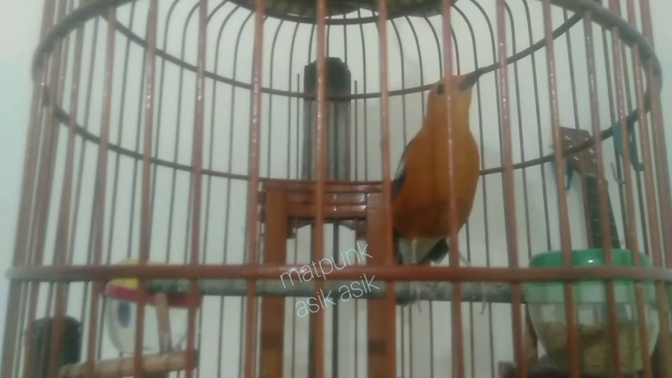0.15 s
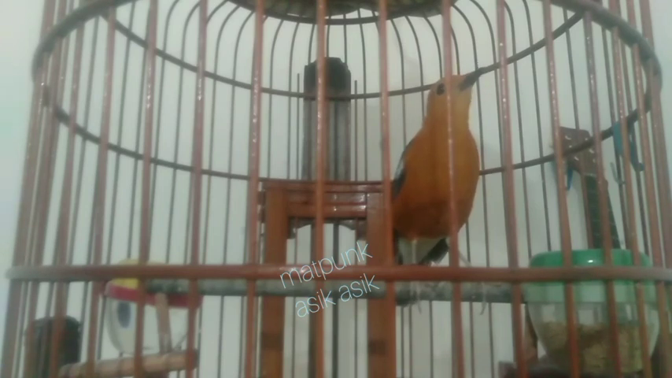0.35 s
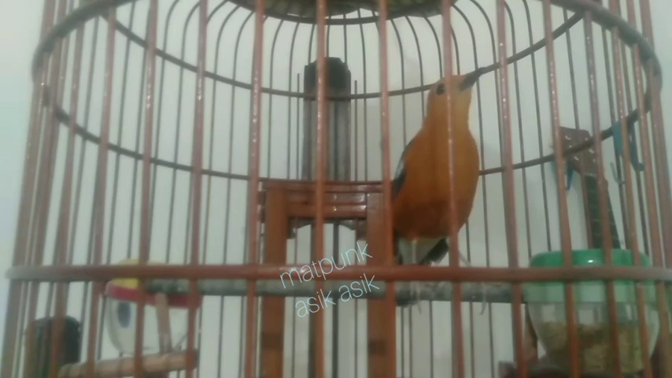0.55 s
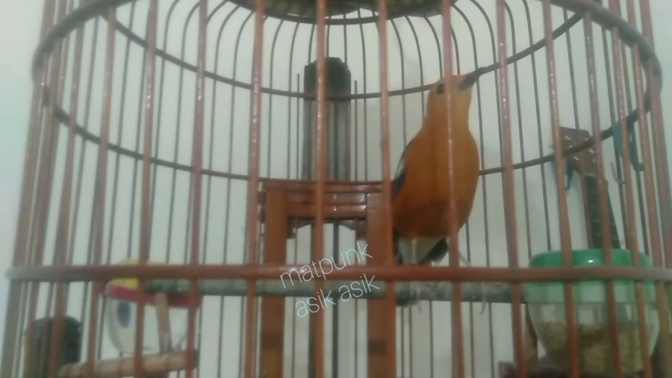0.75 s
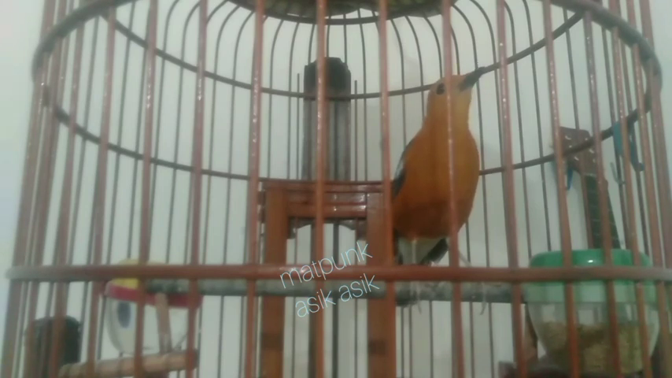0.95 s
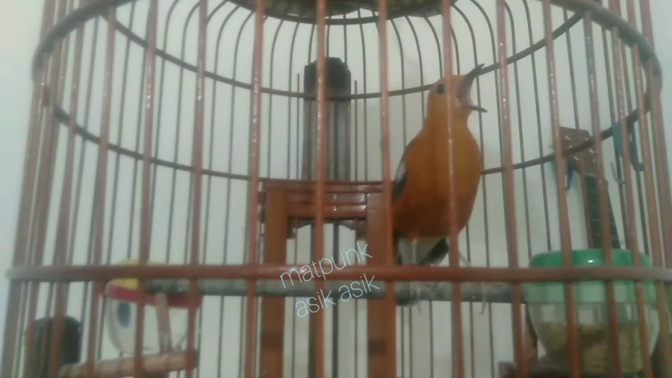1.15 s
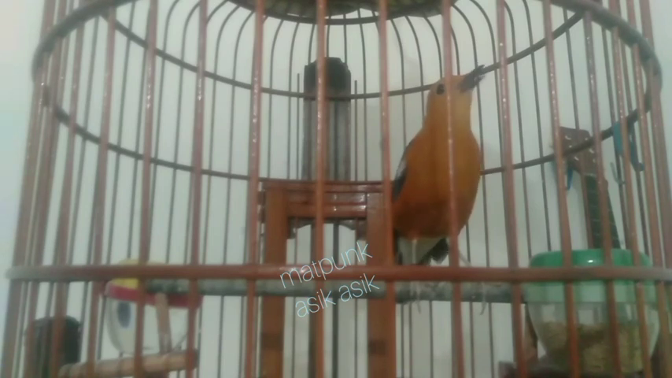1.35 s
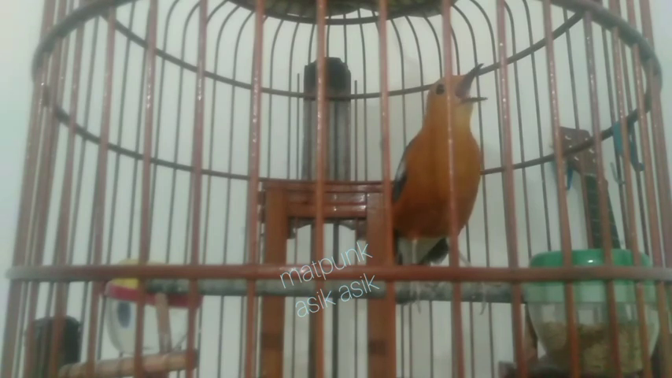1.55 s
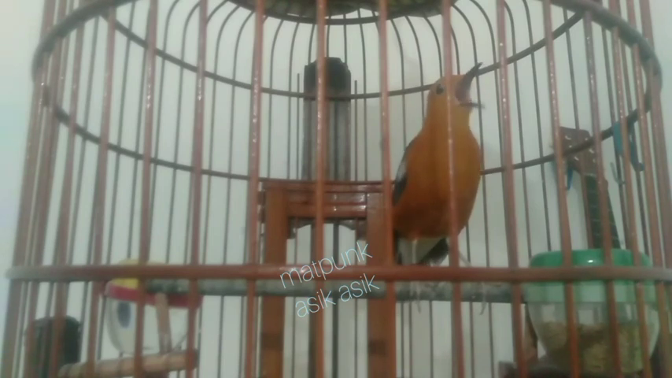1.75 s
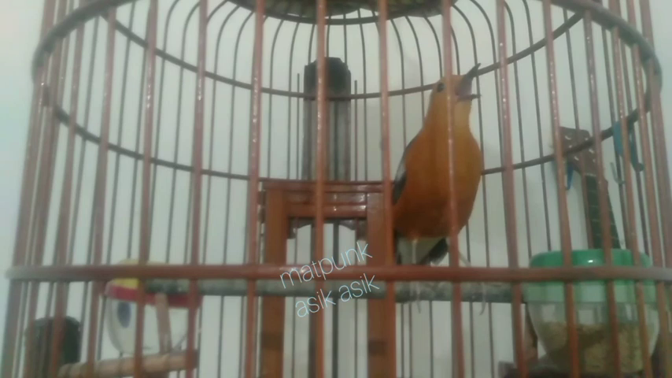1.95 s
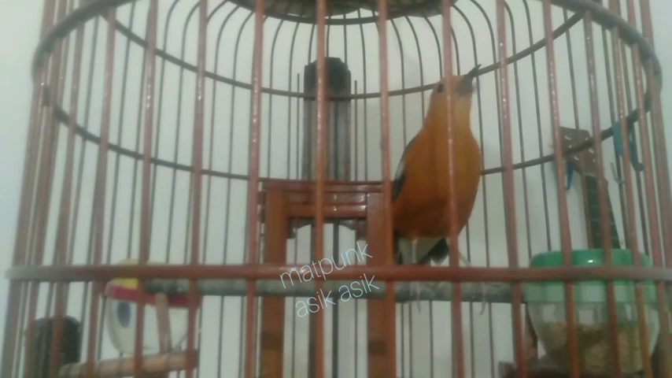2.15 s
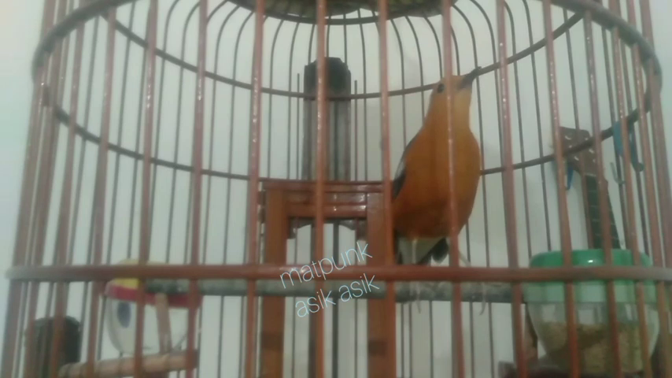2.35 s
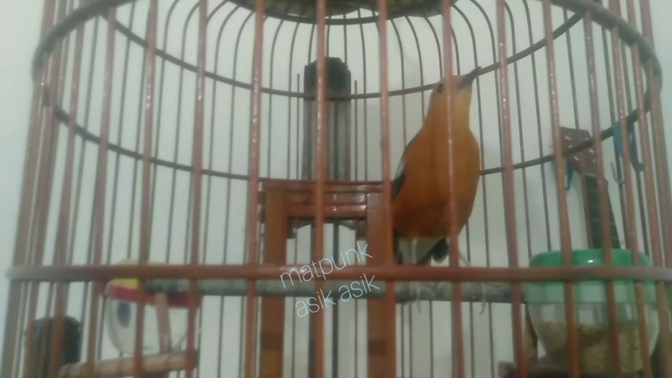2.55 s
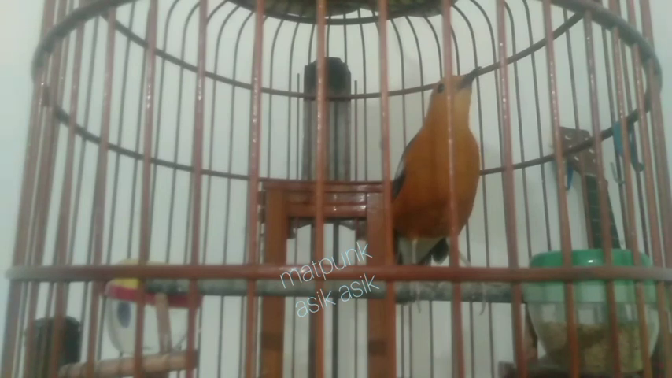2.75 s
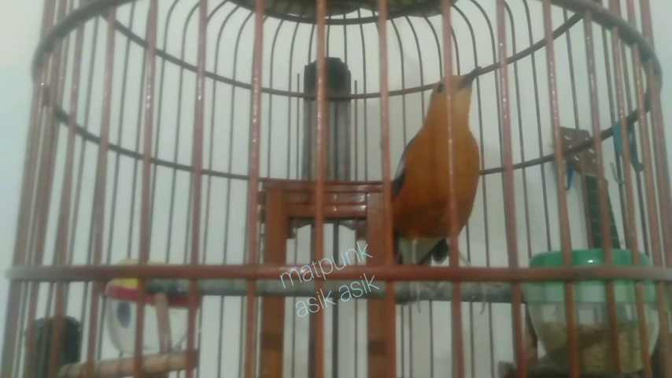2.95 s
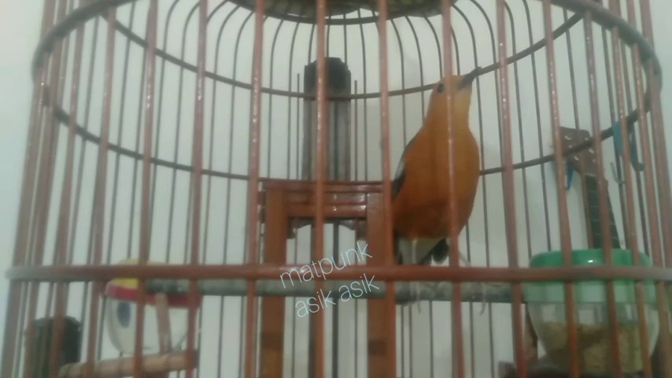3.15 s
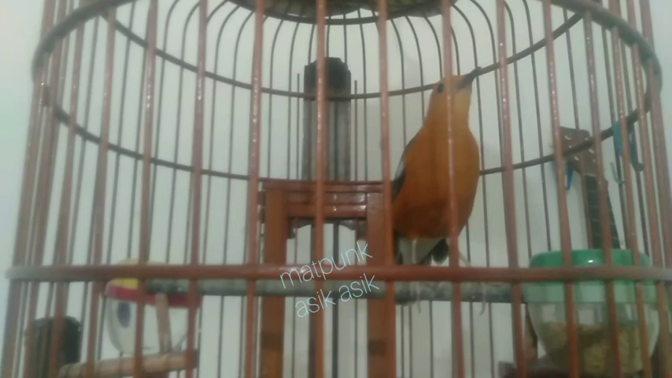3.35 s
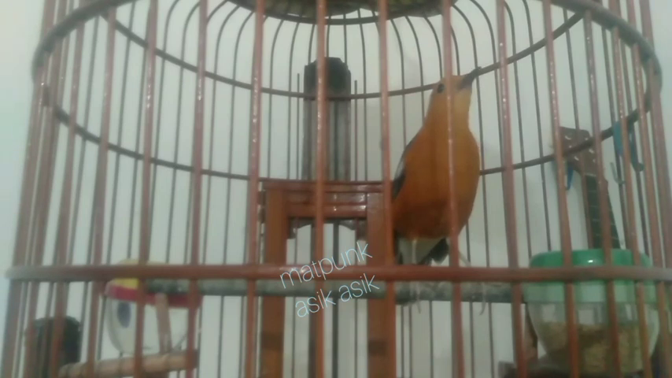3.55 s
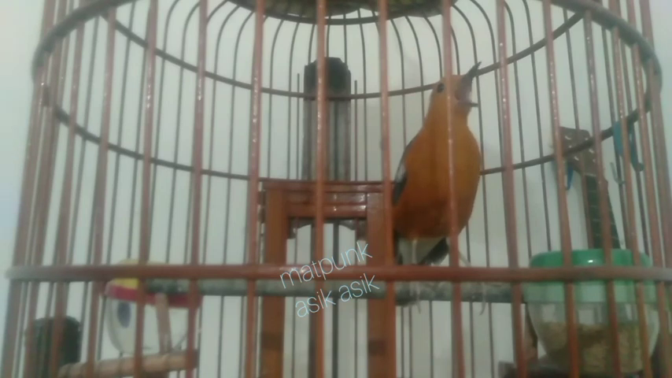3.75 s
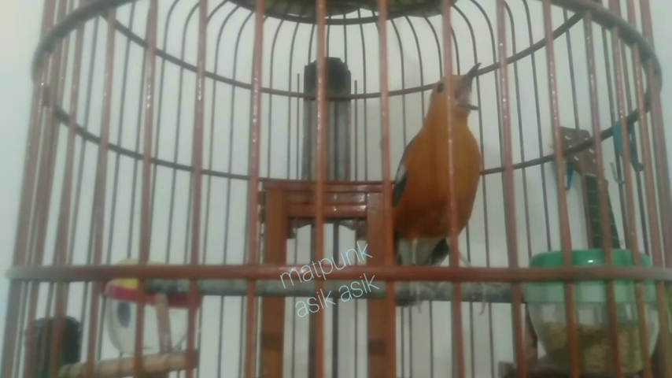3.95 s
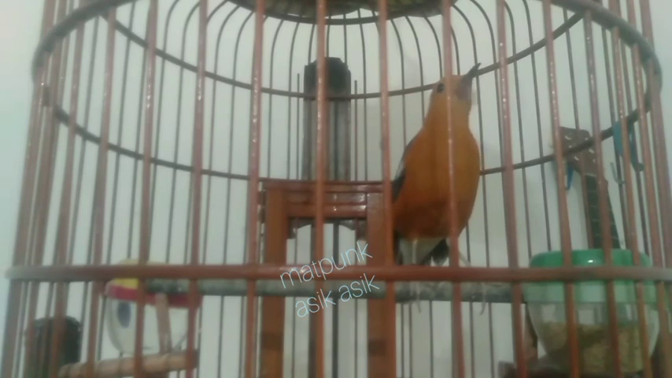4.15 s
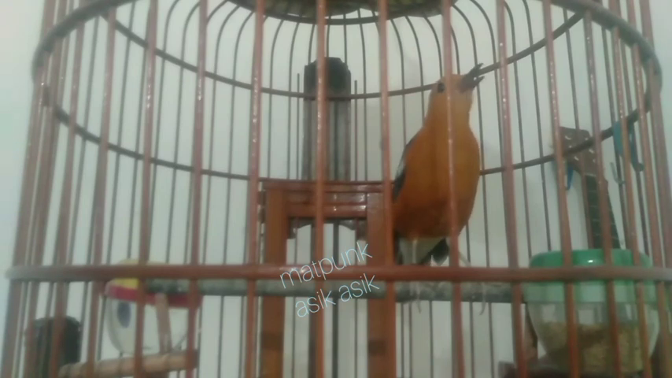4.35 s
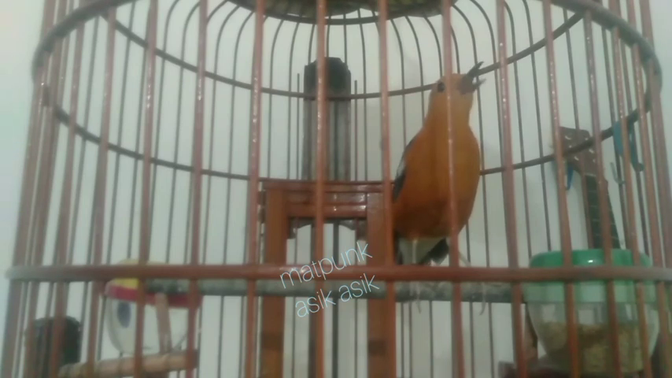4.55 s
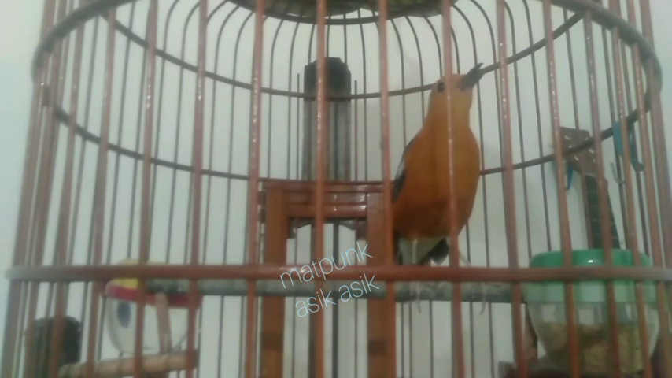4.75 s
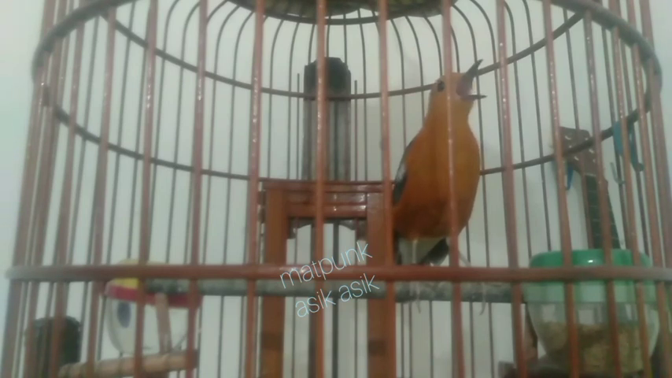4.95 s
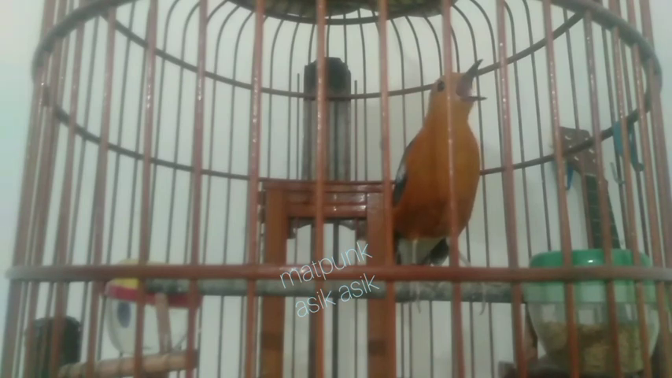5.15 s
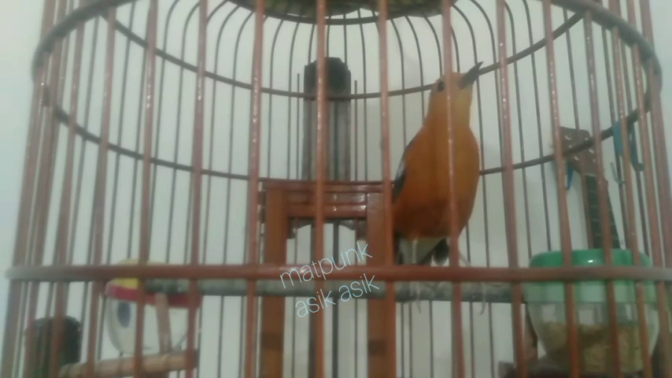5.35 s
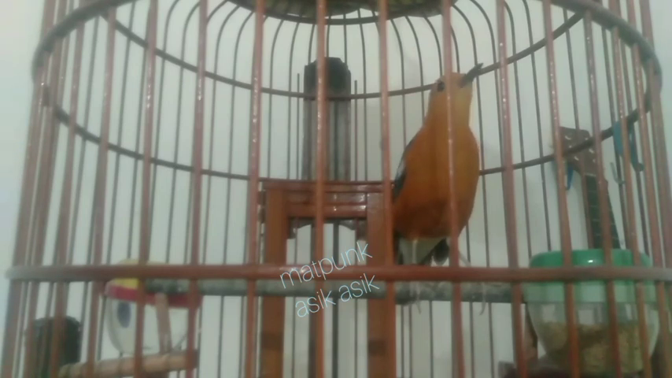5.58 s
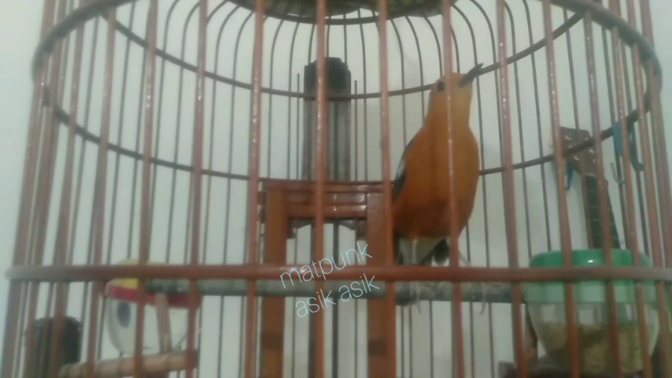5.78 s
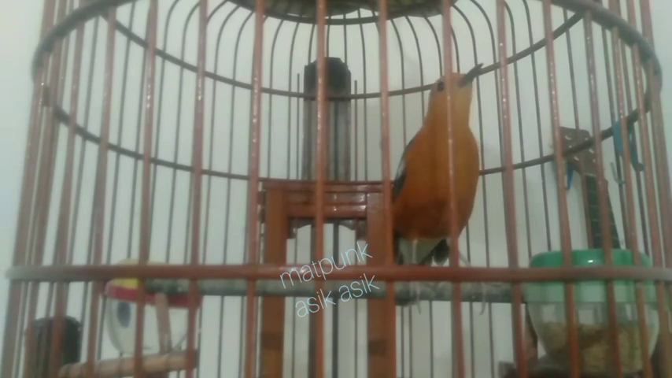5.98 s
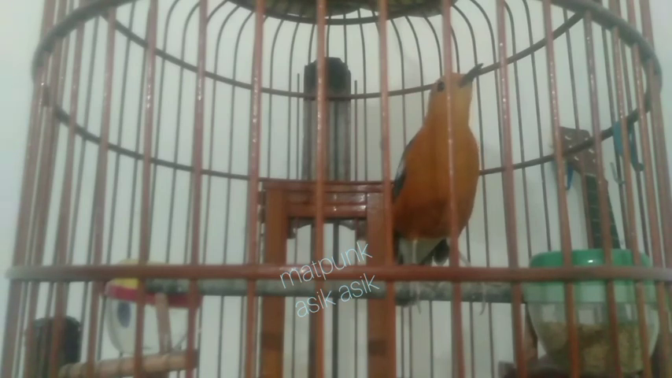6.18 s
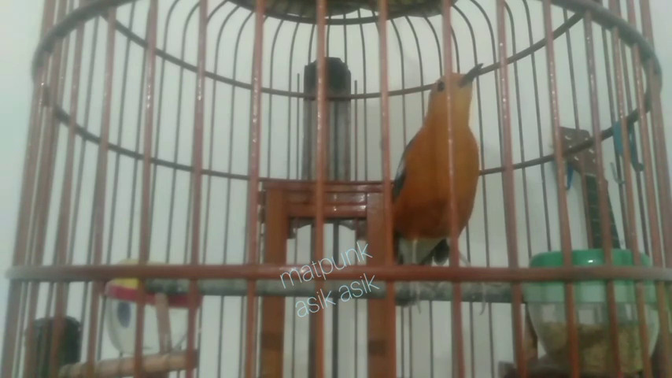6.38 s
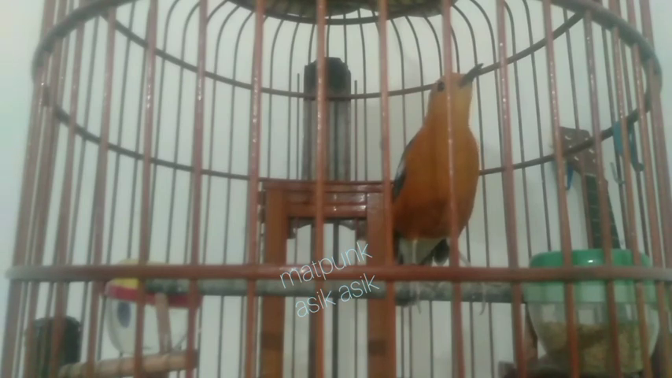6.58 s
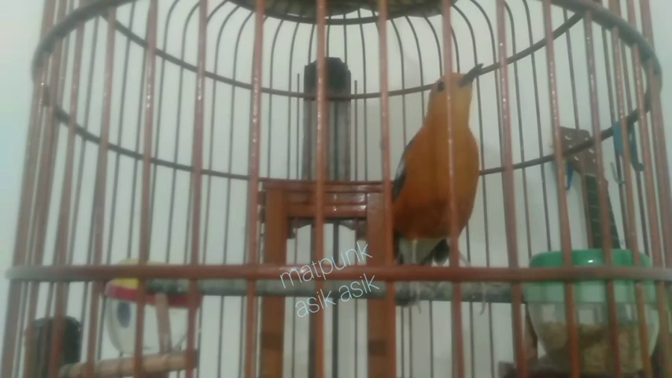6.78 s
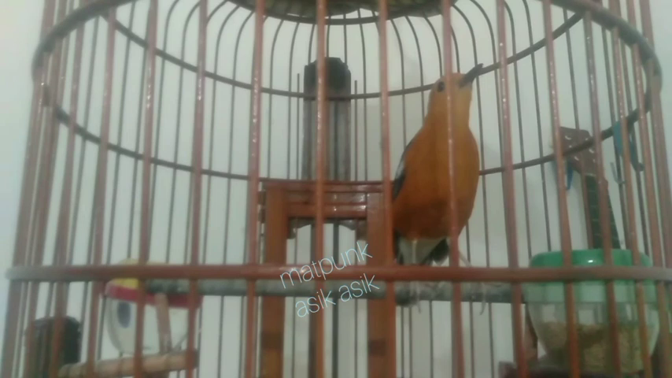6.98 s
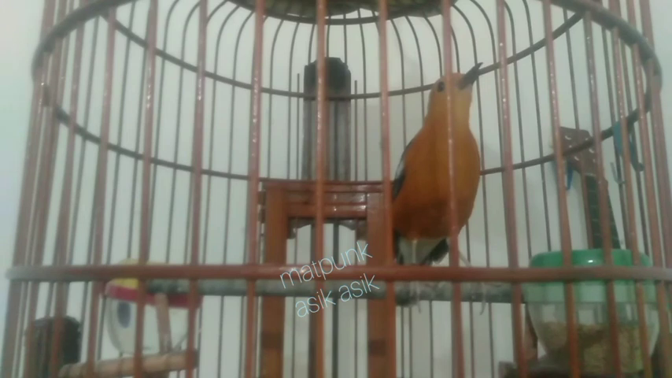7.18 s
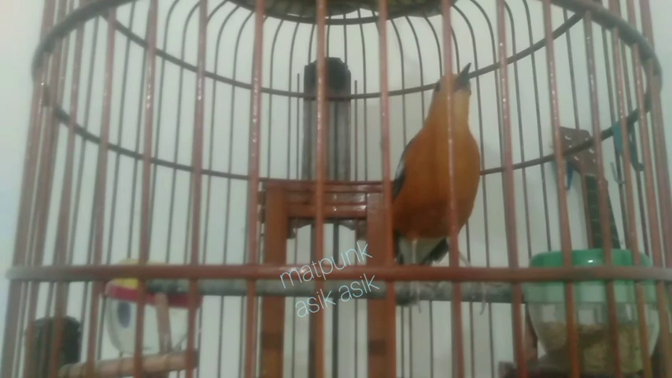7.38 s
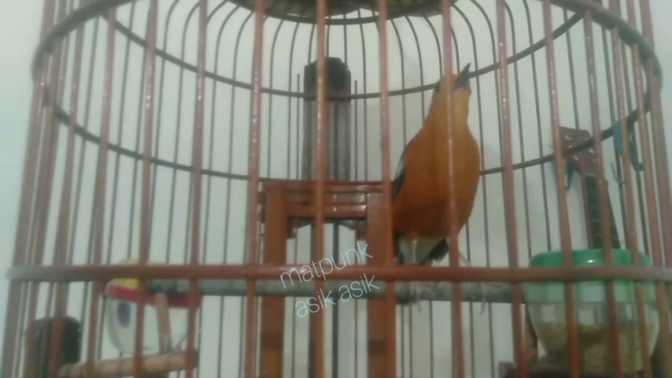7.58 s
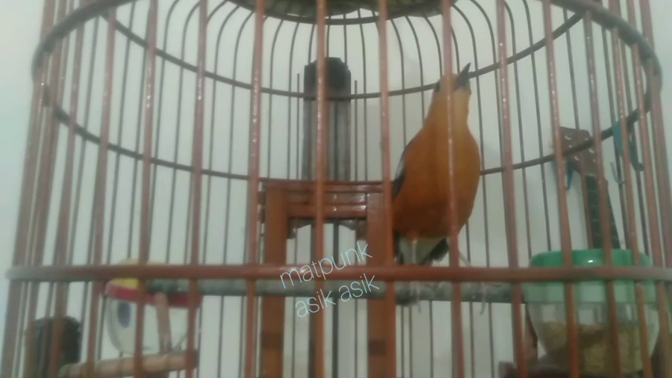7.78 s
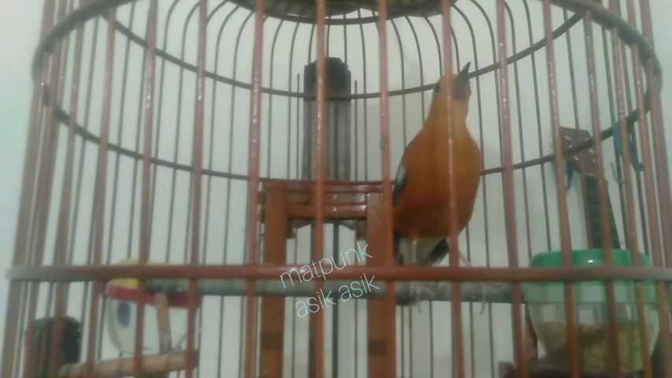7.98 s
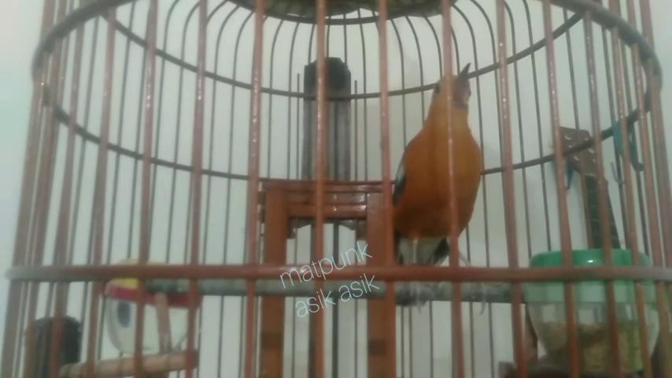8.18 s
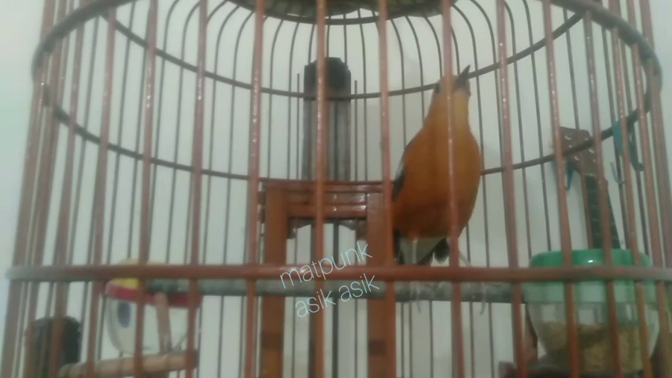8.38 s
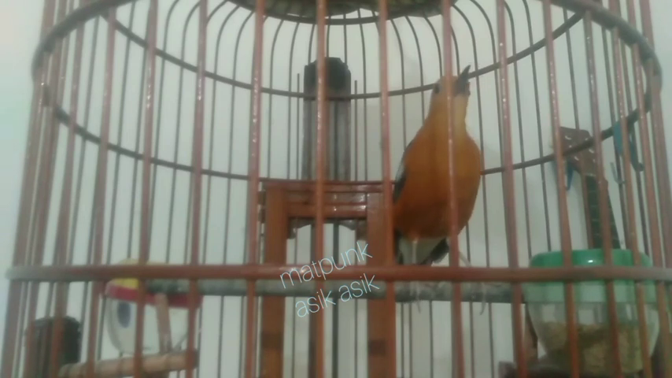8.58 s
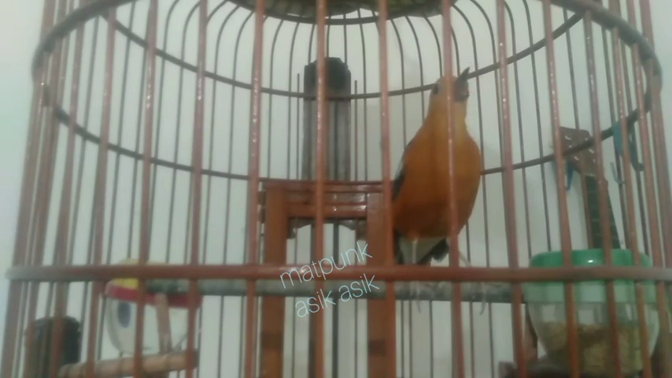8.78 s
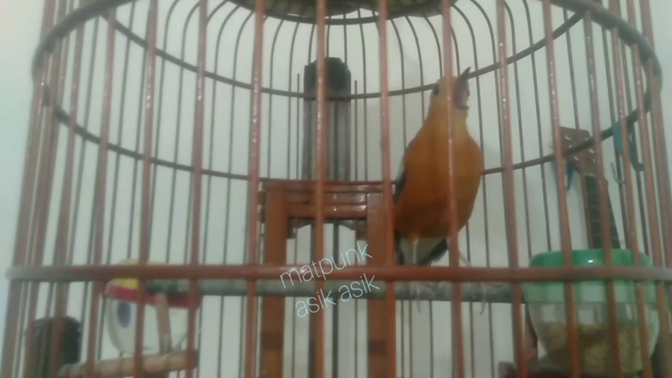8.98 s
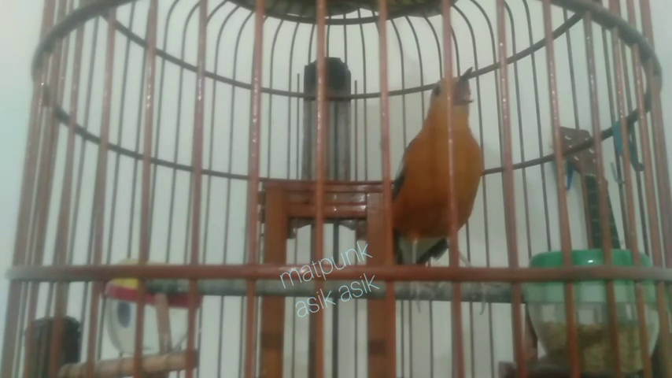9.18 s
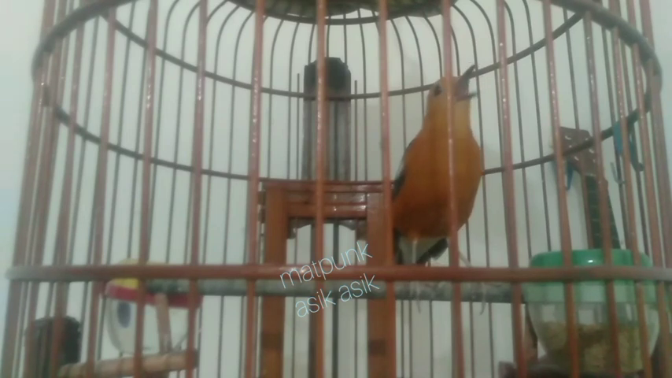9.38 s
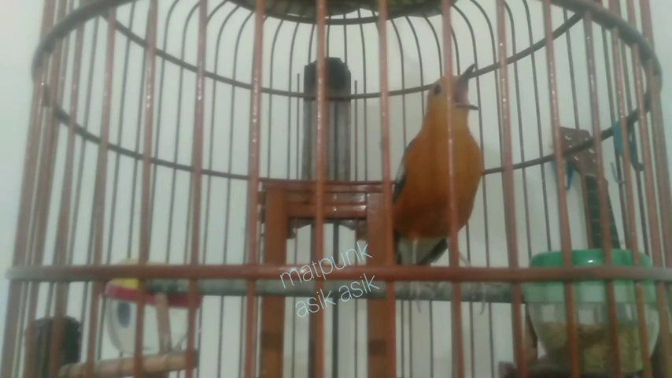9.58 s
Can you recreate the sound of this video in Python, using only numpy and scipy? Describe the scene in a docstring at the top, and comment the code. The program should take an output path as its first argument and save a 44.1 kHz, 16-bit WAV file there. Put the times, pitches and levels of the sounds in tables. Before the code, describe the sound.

A caged thrush sings loud, bright whistles, chirps, trills and whips close by in a hard room, over faint street rumble and hum.

```python
"""A thrush sings close to a small microphone in a hard-walled room while street rumble and engine hum go on.
A passing vehicle, filtered noise, fades first; then the bird, gliding oscillators with harmonics, slurs, swells,
chirps and trills brightly. Far birds, mostly reverberation, join before a long trill, rough tews and double whips;
swells, sagging whistles and two-voiced hooks end the song. The loudest notes overload the input."""
import sys
import numpy as np
from scipy import signal
from scipy.fft import rfft, irfft, next_fast_len
from scipy.io import wavfile
from scipy.ndimage import map_coordinates

SR = 44100
rng = np.random.default_rng(int(sys.argv[2]) if len(sys.argv) > 2 else 0)


def unload_audio(sound):
    """Save the sound as a 16-bit wav file, at the path given as the first command line argument."""
    columns = np.transpose(np.atleast_2d(sound))
    # keep every value between -1 and 1, then stretch to whole-number steps
    steps = np.round(np.clip(columns, -1, 1) * 32767)
    wavfile.write(sys.argv[1], SR, steps.astype(np.int16))


def boost(x):
    """Linear amplitude factor 10**(x/20) for a level x in decibels (scalar or array-like)."""
    u = np.asarray(x, float) / 20
    return 10 ** u


N = 424683
TOP_HZ = 15750  # band limit of harmonics and input


def unit(x):
    """Normalization: scales a signal to a root-mean-square of one."""
    return x / np.sqrt(np.mean(x ** 2) + 1e-20)


def along(points, hz):
    """Logarithmic frequency scale: interpolates (frequency [Hz], value) points along it."""
    f, v = np.transpose(points)
    return np.interp(np.log(hz + 1), np.log(f + 1), v)


def curve(rows):
    """Linear envelope: one value per sample from (time [s], value) rows."""
    return np.interp(np.arange(N) / SR, *np.transpose(rows))


def wobble(rate, size):
    """Band-limited random modulation: a smooth curve through random knots, rate of them a second."""
    knots = rng.standard_normal(int(size * rate / SR) + 4)
    return map_coordinates(knots, [np.arange(size) * rate / SR])


def filtered(x, response):
    """Linear filtering: multiplies the spectrum by a response of frequency."""
    m = next_fast_len(N + SR // 2)
    return irfft(rfft(x, m) * response(np.fft.rfftfreq(m, 1 / SR)), m)[:N]


def coloured_noise(spectrum):
    """Spectral shaping: white noise weighted by (frequency [Hz], density [dB per Hz]) points."""
    return filtered(rng.standard_normal(N), lambda hz: boost(along(spectrum, hz)))


# swell of the traffic's bass: (time [s], level [dB])
TRAFFIC_LEVEL = [(.3, -26), (2.8, -41), (3.8, -36), (7, -32.5), (8.3, -37.5)]
# relative spectrum of street rumble and microphone hiss: (frequency [Hz], density [dB per Hz])
RUMBLE_SPECTRUM = [(20, 0.5), (85, -18), (200, -21.5), (420, -34.5), (5000, -46), (15600, -46.5)]


def rumble_and_hiss():
    """Broadband noise: the bass follows the traffic fully, the rest only in part."""
    floor = coloured_noise(RUMBLE_SPECTRUM)
    low = filtered(floor, lambda hz: 1 / (1 + (hz / 300) ** 4))
    traffic = curve(TRAFFIC_LEVEL)
    bass = low * boost(traffic + wobble(1.2, N))
    rest = (floor - low) * boost(-30 + 0.3 * traffic)
    return (bass + rest) / np.std(low)


# a vehicle drawing away: (time [s], level [dB])
PASSING_LEVEL = [(0, -43), (.5, -39), (1.05, -53), (2.6, -64)]
# relative spectrum of its tyres: (frequency [Hz], density [dB per Hz])
TYRE_SPECTRUM = [(100, -27.5), (200, -6), (650, -5), (2300, -40)]


def passing_vehicle():
    """Tyre noise: a broad band of friction noise decays with distance and flutters slightly."""
    return boost(curve(PASSING_LEVEL) + 1.4 * wobble(7.9, N)) * unit(coloured_noise(TYRE_SPECTRUM))


def engine_hum():
    """Periodic firing: a fundamental near 78 Hz and its octave waver in pitch and level."""
    phase = 2 * np.pi * np.cumsum(78 + 5 * wobble(1.0, N)) / SR
    tone = np.sin(phase) + boost(-8.5) * np.sin(2 * phase)
    return boost(-44 + 1.0 * wobble(3.4, N)) * tone


# reverberation time against frequency: (frequency [Hz], time to fall 60 dB [s])
ROOM_DECAY = [(3000, 0.47), (12000, 0.27)]


def room(x, delay):
    """Diffuse reverberation: a noise tail builds up over delay [s] and each frequency decays at its own rate."""
    hz, t, z = signal.stft(rng.standard_normal(SR), SR, nperseg=256)
    decay = boost(-60 * t / along(ROOM_DECAY, hz)[:, None])
    tail = signal.istft(z * decay, SR, nperseg=256)[1]
    tail *= 1 - np.exp(-np.arange(len(tail)) / (delay * SR))
    return signal.fftconvolve(x, tail / np.linalg.norm(tail))[:N]


def throat(hz):
    """Radiation and resonance: the windpipe radiates little below 2 kHz, softens the top and dips at 6450 Hz."""
    low, high = 1j * hz / 1750, 1j * hz / 5800
    highpass = (low ** 2 / (1 + 1.581 * low + low ** 2)) ** 2
    softening = 0.34 + 0.26 / (1 + 0.96 * high + high ** 2)
    dip = 1 - 0.7 * np.exp(-((hz - 6450) / 600) ** 2)
    return highpass * softening * dip


def beak(hz):
    """Turbulence at a narrow opening: the hiss of leaking air lies mainly above 6550 Hz."""
    return 1 / (1 + (6550 / (hz + 1)) ** 4)


def glide(t, s, v):
    """Cubic Hermite interpolation: a smooth curve through the points, flat at its turns."""
    step = np.diff(v) / np.maximum(np.diff(s), 1e-4)
    both = step[:-1] * step[1:]
    harmonic_mean = 2 * both / (step[:-1] + step[1:] + 1e-9)
    slope = np.r_[step[0], np.where(both > 0, harmonic_mean, 0), step[-1]]
    k = np.clip(np.searchsorted(s, t) - 1, 0, len(s) - 2)
    h = s[k + 1] - s[k]
    u = np.clip((t - s[k]) / h, 0, 1)
    ramp = v[k] + (v[k + 1] - v[k]) * u * u * (3 - 2 * u)
    bend = h * u * (1 - u) * (slope[k] * (1 - u) - slope[k + 1] * u)
    return ramp + bend


# ways of voicing, ahead of the throat: (harmonic 1 [dB], harmonic 2 [dB], harmonic 3 [dB], harmonic 4 [dB])
PURE = (5.5, -30.5, -30.5, -27)
OCTAVE = (-4, 3.5, -17, -7)
REEDY = (-25, 0, -17, -2.5)
BUZZY = (1.5, -2, -6, -5.5)
THIN = (-9.5, 3, -9, 9)
TRILLED = (-0.5, -16, -13.5, -10)
RATTLY = (-1, -4, -9, -14.5)
RINGING = (4, -14, -14, -26)


def sing_note(track, rows, voicing, rough, edge=0.003):
    """Harmonic oscillation of the syrinx: rows are (time [s], pitch [Hz], level [dB]); roughness leaks air."""
    s, hz, db = np.array(sorted(map(tuple, rows)), float).T
    i = np.arange(max(round(s[0] * SR), 0), min(round(s[-1] * SR), N))
    t = i / SR
    shake = 0.2 * wobble(500, len(t)) + 0.5 * wobble(3000, len(t))
    pitch = glide(t, s, hz) * (1 + rough * shake)
    phase = 2 * np.pi * (np.cumsum(pitch) / SR + rng.random())
    # the fifth and sixth harmonics trail the fourth
    series = voicing + (voicing[-1] - 4, voicing[-1] - 7)
    tone = sum(boost(g) * np.sin(k * phase) * (k * pitch < TOP_HZ) for k, g in enumerate(series, 1))
    fade = np.clip(np.minimum(t - s[0], s[-1] - t) / edge, 0, 1)
    unsteady = 1 + 2.5 * rough * wobble(400, len(t))
    effort = np.sqrt(2) * boost(np.interp(t, s, db)) * fade * unsteady
    track[0, i] += effort * tone
    track[1, i] += effort * min(rough, 0.1) * rng.standard_normal(len(t))  # leaking air


# one-off whistles: (voicing, roughness [ratio], rows of (time [s], pitch [Hz], level [dB]))
SINGLE_NOTES = [ (TRILLED, 0.2, [(0, 3350, 4), (.016, 2950, -1.5), (.032, 2700, 7.5)]),
                (PURE, .01, [(7.99, 1568, -14), (8.015, 2964, 4.5), (8.045, 3161, -5.5), (8.09, 3146, -4.5),
                (8.17, 2953, -11), (8.295, 2367, -16.5)]), (PURE, .01, [(8.08, 3953, -21.5),
                (8.12, 3910, -11.5), (8.22, 3627, -3.5), (8.293, 3448, 0.5), (8.302, 2787, -8)]),
                (PURE, 0.2, [(8.645, 2500, -17), (8.662, 2710, -13.5)]), (PURE, .01, [(8.905, 2890, 2),
                (8.92, 3130, -3.5), (8.955, 2606, -0.9), (9.005, 2657, -3), (9.036, 3114, -2),
                (9.061, 2891, -3.5)]), ]


def single_notes(track):
    """Frequency modulation: each whistle follows its own pitch contour."""
    for voicing, rough, rows in SINGLE_NOTES:
        sing_note(track, rows, voicing, rough)


# double-stepped slur: (time from first drop [s], pitch [Hz], level [dB])
SLUR_SHAPE = [(0, 3540, -1), (.015, 2406, 1.5), (.031, 2747, -6), (.044, 1944, -7), (.057, 2150, -5),
              (.072, 1678, -24)]
# its entries: (time of first drop [s], lead-in [s], lead-in level [dB], stretch [ratio], level [dB])
SLUR_ENTRIES = [(1.108, .017, -5.5, 1.0, 0.5), (1.256, .038, -12, 1.14, -2.5)]


def slurs(track):
    """Stepwise frequency modulation: a high lead-in drops in steps, and a stretched slur sits lower."""
    lead_hz, slow_is_low = 3754, 0.37  # the second is the power of the stretch that lowers the pitch
    for s, lead, lead_db, stretch, db in SLUR_ENTRIES:
        steps = np.multiply(SLUR_SHAPE, [stretch, stretch ** -slow_is_low, 1]) + [s, 0, db]
        steps[0, 2] += lead_db
        lead_in = [(s - lead, lead_hz, lead_db - 5.0), (s - lead + 0.008, lead_hz, lead_db)]
        sing_note(track, [*lead_in, *steps], OCTAVE, rough=0.05)


# swelling glides: (time [s], length [s], start pitch [Hz], end pitch [Hz], peak level [dB], voicing)
SWELL_GLIDES = [(1.222, 0.05, 3400, 2834, -9, PURE), (7.992, .018, 1600, 2600, -16, OCTAVE),
                (1.738, 0.097, 3300, 3680, -11, THIN), (8.75, .063, 2240, 2370, 0.5, PURE)]


def swells(track):
    """Amplitude modulation: a steady glide in pitch swells to a peak near its middle and fades."""
    peak = 0.48  # share of the length before the peak
    for s, length, hz0, hz1, db, voicing in SWELL_GLIDES:
        start = (s, hz0, db - 17)
        crest = (s + peak * length, hz0 + peak * (hz1 - hz0), db)
        end = (s + length, hz1, db - 9.5)
        sing_note(track, [start, crest, end], voicing, rough=0.015)


# one chirp: (time from its peak [s], pitch [Hz], level [dB])
CHIRP_SHAPE = [(-.015, 1651, -31), (-.007, 2658, -1.5), (0, 4444, 6.5), (.005, 3168, -1.5), (.01, 4002, 1),
               (.02, 3590, -6.5)]
# its entries: (time [s], level [dB])
CHIRP_ENTRIES = [(1.511, -5.5), (1.583, -2.5), (1.653, -2), (1.723, -1.5)]


def chirps(track):
    """Two-source phonation: a rapid sweep up and down, with a lower, quieter voice running ahead."""
    for at, db in CHIRP_ENTRIES:
        sing_note(track, np.add(CHIRP_SHAPE, [at, 0, db]), TRILLED, rough=0.15)
        ahead = np.add(CHIRP_SHAPE[:3], [at - 0.005, 0, db]) - [0, 100, 5]
        sing_note(track, ahead, TRILLED, rough=0.14)


def trill(marks, number, low_hz, low_db, waist, sink):
    """Periodic frequency modulation: even crests between the marks, joined by troughs, scooped into from below."""
    # waist: share of the pitch swing left halfway down; sink: how far high crests push the troughs down
    every = np.arange(number[-1] + 1)
    times, tops, levels = [np.interp(every, number, column) for column in np.transpose(marks)]
    rows = [(times[0] - 0.015, 2050, levels[0] - 11.5), (times[0] - 0.008, 2600, levels[0] - 7.5)]
    for s, hz, db, half in zip(times, tops, levels, np.gradient(times) / 2):
        low = low_hz - sink * (hz - tops.mean())
        mid = low + waist * (hz - low)
        mid_db = db + low_db / 2
        rows += [(s - half / 2, mid, mid_db), (s, hz, db), (s + half / 2, mid, mid_db), (s + half, low, db + low_db)]
    return np.array(rows)


# marked crests of the bright trill: (time [s], top pitch [Hz], level [dB])
BRIGHT_MARKS = [(1.97, 4025, 2.5), (2.011, 3438, -1), (2.065, 3377, -1), (2.136, 3525, -4),
                (2.179, 3640, -10)]
# which crest each mark is: (index [count])
BRIGHT_INDEX = (0, 2, 4, 7, 9)


def bright_trill(track):
    """Two-source phonation: the other half of the syrinx shadows the trill 1.45 times higher, growing louder."""
    rows = trill(BRIGHT_MARKS, BRIGHT_INDEX, low_hz=2336, low_db=-21.5, waist=0.53, sink=-0.25)
    sing_note(track, rows, PURE, rough=0.026)
    growth = np.outer(rows[:, 0] - rows[0, 0], [0, 0, 40])  # 40 dB a second
    sing_note(track, rows * [1, 1.45, 0] + growth + [0, 0, -24], PURE, rough=0.093)


# far whistles: (time [s], length [s], start pitch [Hz], end pitch [Hz], relative level [dB])
FAR_WHISTLES = [(3.107, 0.054, 3150, 3104, -49), (3.2, 0.066, 3240, 2750, -51.5),
                (3.317, 0.06, 3330, 2974, -49.5), (3.387, 0.22, 2932, 3480, -52.5),
                (5.866, 0.203, 2215, 3015, -51), (6.199, .09, 2250, 2500, -47),
                (6.293, 0.087, 2727, 2367, -50), (6.42, 0.063, 2400, 3557, -48),
                (6.53, 0.049, 2757, 2403, -48.5), (6.533, .5, 1795, 2099, -48),
                (6.821, .11, 2276, 2660, -50.5), (7.36, .05, 2755, 2410, -50.5),
                (7.607, 0.055, 2700, 2458, -52)]
# a repeated short falling whistle: (time [s], relative level [dB])
FAR_FALLS = [(7.085, -50), (7.259, -56), (7.428, -55), (7.594, -54), (7.8, -57)]


def far_birds():
    """Reverberant field: beyond the critical distance, whistles arrive mostly as reflections."""
    song = np.zeros((2, N))
    falls = [(s, 0.03, 2020, 1720, db) for s, db in FAR_FALLS]
    leap_s = 0.045  # a whistle crossing a wide interval gets there this quickly, then holds
    for s, length, hz0, hz1, db in FAR_WHISTLES + falls:
        leap = max(hz0, hz1) > 1.27 * min(hz0, hz1) and length > 1.5 * leap_s
        turn = leap_s if leap else 0.6 * length
        turn_hz = hz1 if leap else hz0 + 0.65 * (hz1 - hz0)
        rows = [(s, hz0, db - 6.0), (s + turn, turn_hz, db + 0.5), (s + length, hz1, db - 6.5)]
        sing_note(song, rows, PURE, rough=0.035, edge=0.0062)
    return boost(-6.0) * song[0] + boost(-3.5) * room(song[0], delay=0.0074)


# marked crests of the long trill: (time [s], top pitch [Hz], level [dB])
LONG_MARKS = [(3.742, 5112, -3), (3.763, 4669, -7), (3.811, 4054, -4.5), (3.965, 4247, -7),
              (4.094, 4440, -5.5), (4.151, 4949, -11), (4.175, 3600, -12)]
# which crest each mark is: (index [count])
LONG_INDEX = (0, 1, 3, 9, 14, 16, 17)


def long_trill(track):
    """Two-source phonation: a rattling second voice follows the trill with a much narrower swing."""
    rows = trill(LONG_MARKS, LONG_INDEX, low_hz=2803, low_db=8.5, waist=0.23, sink=0.26)
    sing_note(track, rows, TRILLED, rough=0.085)
    sing_note(track, rows * [1, 0.22, 0] + [0, 1900, -8], RATTLY, rough=0.08)


# the flick that opens a tew: (time from its peak [s], pitch [Hz], level [dB])
TEW_FLICK = [(-.011, 2103, -22.5), (-.004, 2406, -8), (0, 3443, -7), (.005, 2500, -3)]
# the harsh upper voice over that flick: (time from its peak [s], pitch [Hz], level [dB])
TEW_RASP = [(-.012, 5300, -14), (0, 5600, -5.5), (.008, 4200, -9.5), (.022, 4900, -10)]
# the body of a tew: (time from the flick's peak [s], pitch [Hz], level [dB])
TEW_BODY = [(.004, 2523, -3), (.022, 2752, -0.5), (.042, 2900, -4), (.072, 2643, -12)]
# tew entries: (time [s], level [dB])
TEW_ENTRIES = [(4.295, -0.5), (4.484, -1), (4.671, -0.5)]


def tews(track):
    """Transient and sustained phonation: a flick with a harsh upper voice opens a buzzing arch."""
    for at, db in TEW_ENTRIES:
        sing_note(track, np.add(TEW_FLICK, [at, 0, db]), RINGING, rough=0.14)
        sing_note(track, np.add(TEW_RASP, [at, 0, db]), TRILLED, rough=0.2)
        sing_note(track, np.add(TEW_BODY, [at, 0, db]), BUZZY, rough=0.085)


# double whips: (time [s], dip pitch between the arches [Hz], time to second arch [s], level [dB])
WHIP_ENTRIES = [(4.882, 1126, 0.015, -10), (4.943, 1152, .016, -6.5), (5.012, 2044, 0.014, -6),
                (5.081, 1841, 0.015, -5.5), (5.148, 1860, .016, -6), (5.226, 2100, 0.014, -5.5),
                (5.304, 2144, 0.012, -6.5)]


def whips(track):
    """Two-source phonation: double arches under an upper voice whose swing settles as a damped oscillation."""
    top, rise = 2500, 0.012  # arch pitch (Hz), rise time (s)
    rest_hz, swing_hz = 4900, 2320  # upper voice
    quicken, settle = 0.62, 0.62  # spacing of the later half swings, decay per beat
    for turn, (s, dip, gap, db) in enumerate(WHIP_ENTRIES):
        arches = [
            (s - rise, 1150 + 35 * turn, db - 2), (s - rise / 2, 0.85 * top, db - 5), (s, top, db),
            (s + gap * 0.45, dip, db - 0.018 * (top - dip)),  # deeper dips are quieter
            (s + gap * 0.59, (dip + top) / 2, db - 6.0), (s + gap, top, db + 0.5),
        ]
        tail = [(s + gap * 1.4, 0.93 * top, db - 2), (s + gap * 2.3, 1.04 * top, db - 8)]
        sing_note(track, arches + tail, REEDY, rough=0.07)
        half = np.arange(5 + turn)  # half swings: later whips flutter longer
        beat = np.minimum(half, 3 + quicken * (half - 3)) - 1  # quicker after the second crest
        swing = np.minimum(1, settle ** (beat - 2)) * (half % 2)
        flutter = np.transpose([s + gap / 2 * beat, rest_hz + swing_hz * swing, db - 4 + 6 * swing])
        sing_note(track, flutter, TRILLED, rough=0.04)


# sagging whistles: (time [s], length [s], rim pitch [Hz], sag [Hz], level [dB])
BOWL_ENTRIES = [(8.565, .081, 2307, 149.5, 2), (8.659, .093, 2296, 95, 3)]


def bowls(track):
    """Frequency modulation: a whistle sags from its rim and regains part of the fall."""
    for s, length, rim, sag, db in BOWL_ENTRIES:
        start = (s, rim, db - 2.5)
        bottom = (s + 0.45 * length, rim - sag, db)
        end = (s + length, rim - (1 - 0.6) * sag, db - 2.5)  # 0.6 of the sag regained
        sing_note(track, [start, bottom, end], PURE, rough=0.007)


# hooks, mostly in pairs: (time [s], length [s], crest pitch [Hz], pitch it falls towards [Hz], level [dB])
HOOK_ENTRIES = [(9.169, .035, 4767, 2399, 1), (9.172, .039, 5710, 3978, -13.5),
                (9.312, .072, 4610, 3127, -2), (9.313, .044, 3704, 2504, -5),
                (9.519, .12, 4718, 4036, -2.5), (9.52, 0.1, 3960, 2755, -4.5)]


def hooks(track):
    """Two-source phonation: both halves of the syrinx scoop up, then fall along Gaussian curves."""
    scoop, fall_s = 0.011, 0.028  # rise time, time constant of the fall (s)
    for s, length, crest, floor, db in HOOK_ENTRIES:
        t = np.linspace(0, length - scoop, 16)
        pitch = floor + (crest - floor) * np.exp(-(t / fall_s) ** 2)
        fall = np.transpose([s + scoop + t, pitch, db - 66.5 * t])  # fades 66.5 dB a second
        sing_note(track, [(s, crest - 688, db - 9.5), *fall], RINGING, rough=0.02)


def thrush():
    """Source and filter: the syrinx sounds through the throat, and leaking air through the beak."""
    track = np.zeros((2, N))  # tone, air
    for figure in (single_notes, slurs, swells, chirps, bright_trill, long_trill, tews, whips, bowls, hooks):
        figure(track)
    return filtered(track[0], throat) + filtered(track[1], beak)


def scene():
    """Superposition: street, thrush, its reverberation and the far birds add linearly."""
    street = rumble_and_hiss() + passing_vehicle() + engine_hum()
    song = thrush()
    near = song + boost(-8.5) * room(song, delay=0.001)
    return (near + far_birds() + street)[None]


def roll_off(x):
    """The treble ends steeply here."""
    return signal.sosfilt(signal.butter(12, 15750, fs=SR, output="sos"), x)


def record(dry):
    """Nonlinear distortion: the input saturates a little lopsidedly, cuts the bass and is band-limited."""
    even = filtered(dry[0] ** 2, lambda hz: hz / (hz + 250))  # even overtones and difference tones
    lopsided = dry[0] + 0.014 * even
    clipped = lopsided / (1 + np.abs(lopsided / 0.65) ** 6) ** (1 / 6)
    band = filtered(clipped, lambda hz: (hz < TOP_HZ) * 1j * hz / (140 + 1j * hz))
    return roll_off(band[None])


dry = scene()
out = record(dry)
unload_audio(out)
```